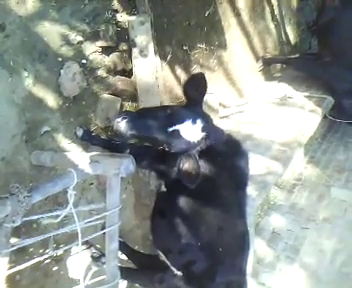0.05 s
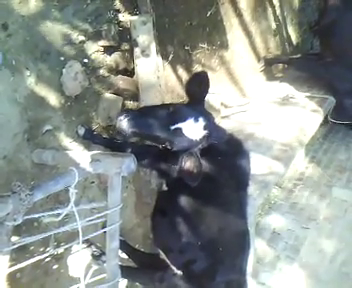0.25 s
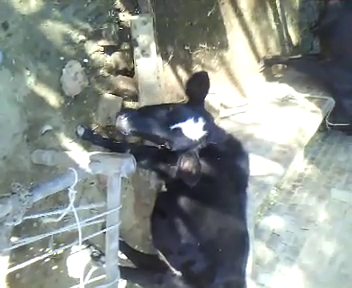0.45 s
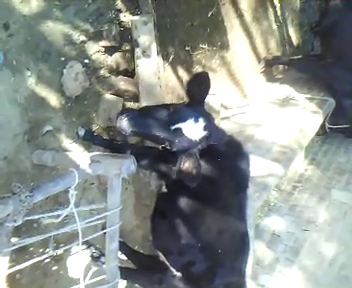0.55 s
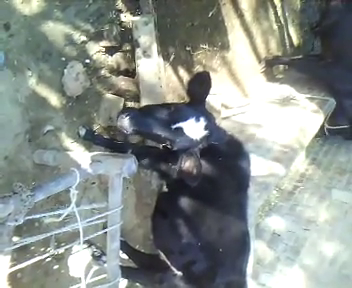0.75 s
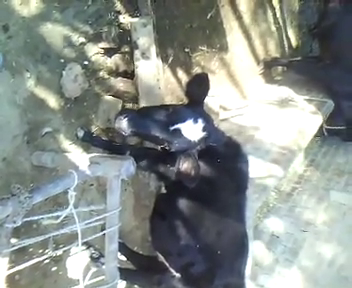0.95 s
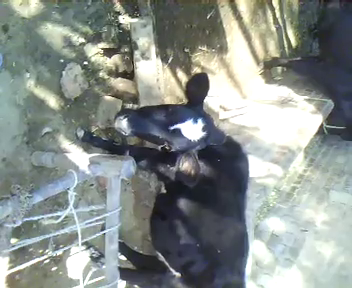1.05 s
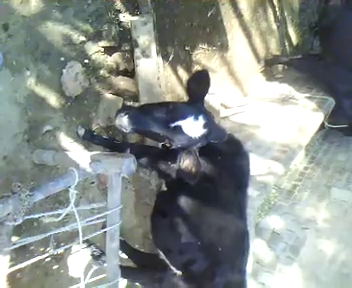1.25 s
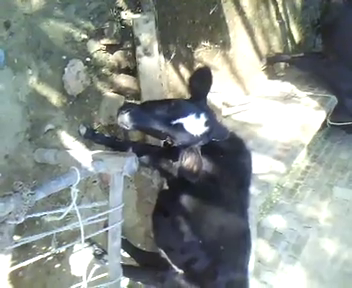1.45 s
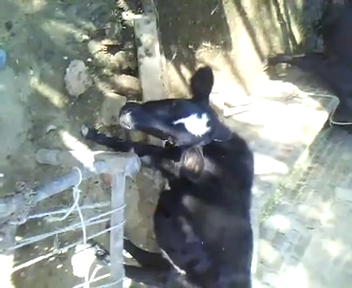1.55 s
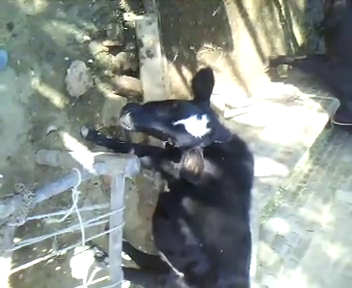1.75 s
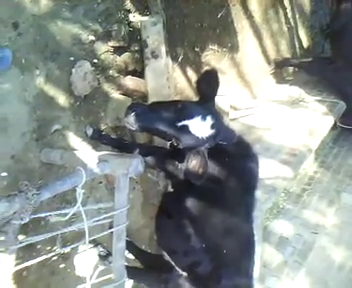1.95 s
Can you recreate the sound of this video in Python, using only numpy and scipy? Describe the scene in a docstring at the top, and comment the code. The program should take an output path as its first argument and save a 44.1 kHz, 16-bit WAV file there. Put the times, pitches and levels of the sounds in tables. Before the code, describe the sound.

A calf gives one long moo, close below the microphone in a yard. It begins as a muffled hum, rising in pitch. The mouth opens halfway around 0.4 seconds, wide around 0.8, then wide again from about 1.1 for the loudest, held part. From 1.5 seconds the pitch sags into a low creak, ending near 1.7. The walls add a very short echo, then it falls silent.

```python
"""A calf gives one long moo in a yard, about a metre below the microphone.
Its vocal folds beat in a clean pulse train whose pitch arches and sags at the end. The call starts as a
hum with the mouth shut; the mouth opens three times, halfway and then wide, lips just parted in between,
and closes on a low creak. The ground mirrors the voice and the walls add a short tail, over a faint
distant rumble and hum. The noise gate behind the microphone shuts when the call ends."""
import sys
import numpy as np
from scipy import signal
from scipy.fft import rfft, irfft
from scipy.io import wavfile
from scipy.ndimage import uniform_filter1d

SR = 44100
rng = np.random.default_rng(int(sys.argv[2]) if len(sys.argv) > 2 else 0)


def store_wav(level_fs):
    """Save 16-bit WAV to argv[1]."""
    pcm = np.round(np.clip(np.atleast_2d(level_fs), -1, 1) * 32767)
    wavfile.write(sys.argv[1], SR, pcm.T.astype(np.int16))


N = 88200

# Resonances of throat, nose and mouth, one table per mouth shape (f/Hz, bandwidth/Hz, relative level/dB)
SHUT_RESONANCES = [(280, 220, -53), (526, 83.0, -42.5), (769, 68, -36.5), (1168, 187.0, -37.5),
                   (1920, 70, -47.5), (2190, 110, -44.5), (3138, 270, -46), (3670, 379.0, -62.5),
                   (4640, 130, -72.5), (4954, 110, -56), (5935, 206.0, -67.5)]
PARTED_RESONANCES = [(327, 240, -52), (481.4, 24, -41), (813, 110, -39.5), (1102, 101, -34.5),
                     (1214, 86, -33.5), (1927, 80, -48.5), (2350, 200, -48), (3407, 260, -53.0),
                     (4225, 72, -52.5), (4800, 200, -59.5), (5890, 200, -63), (7040, 57, -81.5)]
HALF_OPEN_RESONANCES = [(370, 21, -27), (481, 46, -41), (870, 43, -47.5), (1240, 150.0, -28),
                        (1716, 270, -33.5), (1998, 110, -30), (2547.0, 117, -27.5), (3210, 220, -40),
                        (3650, 53, -38.5), (4350, 310, -47.5), (5190, 210, -50), (5820, 223.0, -55.5),
                        (6800, 480, -80.5)]
WIDE_OPEN_RESONANCES = [(354.7, 29.7, -27), (451, 120, -35.5), (810, 120, -41), (1110, 83, -26),
                        (1490, 232, -31.5), (2058, 88, -27), (2538, 130, -27.5), (2976, 87, -30.5),
                        (3340, 550, -45.5), (4405, 71, -47), (4660, 140, -49), (5485, 150, -52.5),
                        (5920, 220, -56.5), (6560, 350, -70), (7210, 120, -66)]
# How strongly the voice drives each mouth shape (t/s, relative level/dB)
SHUT_DRIVE = [(0, -9), (.06, -6), (0.129, -5), (0.219, -3), (0.311, -2.5), (.38, -6), (0.458, -44),
              (1.5, -45.5), (1.601, -9), (1.669, -3), (1.71, -31)]
PARTED_DRIVE = [(.285, -12), (.38, 2), (.507, 1), (.65, -1), (.73, 1), (.81, -5.5), (.88, -2), (.95, -4.5),
                (1.045, 0), (1.122, -24.5)]
HALF_OPEN_DRIVE = [(0.283, -36), (.31, -17), (0.335, -2), (0.376, 0.6), (0.422, -0.5), (0.447, -10),
                   (.496, -36)]
WIDE_OPEN_DRIVE = [(.39, -34), (.438, -7.5), (.495, -32.5), (.662, -32), (.724, -12), (.773, -2.5),
                   (.85, -3), (0.884, -16), (.928, -34.5), (.987, -27), (1.063, -2), (1.127, 1.23),
                   (1.36, 2), (1.52, 1.13), (1.614, -2.3), (1.674, -9.5), (1.712, -20.5)]


def calf():
    """The calf, a metre below the microphone: the same pulses sound through each mouth shape in turn."""
    pulses = vocal_folds()
    shapes = [(SHUT_RESONANCES, SHUT_DRIVE), (PARTED_RESONANCES, PARTED_DRIVE),
              (HALF_OPEN_RESONANCES, HALF_OPEN_DRIVE), (WIDE_OPEN_RESONANCES, WIDE_OPEN_DRIVE)]
    return sum(throat(pulses * fading(drive), resonances) for resonances, drive in shapes)


# Pitch of the vocal folds (t/s, f/Hz)
FOLD_PITCH = [(0.0, 89.3), (0.07, 90.87), (0.14, 94.9), (0.3, 105.5), (0.39, 113), (0.44, 115.2),
              (0.6, 119.4), (0.78, 122.4), (0.9, 121.4), (0.98, 120.3), (1.08, 120.9), (1.2, 118.31),
              (1.36, 115), (1.5, 109.8), (1.55, 105.6), (1.6, 98.2), (1.645, 87.4), (1.69, 73.97)]
# Sharpness of the pulses: the folds close softly at the start and the end (t/s, tilt/(dB per kHz))
FOLD_TILT = [(0, -2.5), (.085, -1.6), (.135, 0.75), (.4, -0.27), (.8, .5), (1.1, .5), (1.4, -0.15),
             (1.58, -0.66), (1.695, -4)]


def vocal_folds(harmonics=99, jitter=0.0011, shimmer_db=0.1451, wobble_hz=110):
    """The folds close once a cycle, slightly uneven in pitch and level; air hisses after each pulse."""
    pitch_hz = curve(FOLD_PITCH) * (1 + jitter * walk(wobble_hz))
    cycles = np.cumsum(pitch_hz) / SR - .5
    db_per_harmonic = curve(FOLD_TILT) * pitch_hz / 1000
    fundamental = amp(db_per_harmonic) * np.exp(2j * np.pi * cycles)
    # The harmonics add up as a geometric series.
    pulses = np.real((fundamental - fundamental ** (harmonics + 1)) / (1 - fundamental))
    air = signal.sosfilt(signal.butter(2, 3500, "high", fs=SR, output="sos"), rng.standard_normal(N))
    air_db = -7.5 + (harmonics + 1) / 2 * db_per_harmonic  # follows the middle harmonic
    puffs = np.exp(-(cycles % 1) / 0.28)  # each decays in about a quarter of a cycle
    shimmer = amp(shimmer_db * walk(wobble_hz))
    return pulses * shimmer + amp(air_db) * puffs * air


def throat(x, resonances, low_edge_hz=271, high_edge_hz=7700):
    """The resonances of one mouth shape ring; beyond the two edges the voice falls off steeply."""
    def power(f):
        peaks = sum(amp(db) ** 2 / (1 + 1.66 * ((f - hz) / bandwidth) ** 2) ** 2
                    for hz, bandwidth, db in resonances)
        return peaks / (1 + (low_edge_hz / f) ** 20) / (1 + (f / high_edge_hz) ** 80)
    return ring(x, power)


# Close echoes off the ground, the yard gate and the walls (delay t/s, level/dB before dulling)
CLOSE_ECHOES = [(.00256, -6.5), (.00479, -10.5), (.00592, -14), (.00717, -12.5), (0.01, -16)]


def yard(voice, dull_above_hz=2210, scatter_above_hz=2980):
    """The microphone hears the voice, dull echoes, a wall tail and treble off nearby bars and stones."""
    f = np.fft.rfftfreq(2 * N, 1 / SR)
    echoes = sum(amp(db) * np.exp(-2j * np.pi * f * delay) for delay, db in CLOSE_ECHOES)
    dull_echoes = echoes / (1 + (f / dull_above_hz) ** 2)
    near = irfft(rfft(voice, 2 * N) * (1 + dull_echoes))[:N]
    walls = tail(voice, t60_s=0.21, gap_s=0.0051)
    treble = ring(voice, lambda f: 1 / (1 + (scatter_above_hz / f) ** 6))
    scatter = tail(treble, t60_s=0.04, gap_s=0.0011)
    return near + amp(-11.5) * walls + amp(-5.5) * scatter


def tail(x, t60_s, gap_s):
    """Dense reflections reach the microphone after a short gap and die away."""
    t = np.arange(N // 2) / SR
    response = rng.standard_normal(len(t)) * np.exp(-np.log(1000) * t / t60_s) * (t > gap_s)
    return signal.fftconvolve(x, response / np.linalg.norm(response))[:N]


# Spectrum of the outdoor rumble, far from the microphone (f/Hz, relative level/dB)
RUMBLE_SPECTRUM = [(20, -5.5), (55, -14), (150, -14), (300, -6.5), (1000, -1), (3000, -14), (6000, -25.5),
                   (9000, -49)]


def background(rumble_db=-57, hum_hz=99.5, hum_db=-73.5):
    """In the distance, faint outdoor rumble and a low, slightly wavering hum."""
    hz, db = np.array(RUMBLE_SPECTRUM).T
    rumble = ring(rng.standard_normal(N), lambda f: amp(np.interp(np.log(f), np.log(hz), db)) ** 2)
    wavering_hz = hum_hz * (1 + .01 * walk(rate_hz=12))
    hum = np.sqrt(2) * np.sin(2 * np.pi * np.cumsum(wavering_hz) / SR)
    return amp(rumble_db) * rumble / rumble.std() + amp(hum_db) * hum


def amp(db):
    """Decibels to gain."""
    return 10 ** (np.asarray(db) / 20)


def curve(points):
    """Join (t/s, value) points by straight lines."""
    return np.interp(np.arange(N) / SR, *np.array(points).T)


def fading(points, release_db_per_s=425):
    """Gain of a (t/s, level/dB) curve that dies away before its first point and after its last."""
    t = np.arange(N) / SR
    outside_s = np.maximum(points[0][0] - t, 0) + np.maximum(t - points[-1][0], 0)
    return amp(curve(points) - release_db_per_s * outside_s)


def walk(rate_hz):
    """Smooth random wander with a spread of 1."""
    hold = int(SR / rate_hz)
    steps = np.repeat(rng.standard_normal(N // hold + 1), hold)
    wander = uniform_filter1d(steps, hold)[:N]
    return wander / wander.std()


def ring(x, power):
    """Causal filter with the power response power(f/Hz)."""
    size = 2 * N
    f = np.maximum(np.fft.rfftfreq(size, 1 / SR), 1)
    cepstrum = irfft(np.log(power(f) + 1e-13) / 2)
    cepstrum[1:N] *= 2  # minimum phase: ringing only follows its cause
    cepstrum[N + 1:] = 0
    return irfft(rfft(x, size) * np.exp(rfft(cepstrum)))[:N]


def scene():
    """One microphone in the yard: the calf close below it, the background far off."""
    return (yard(calf()) + background())[None]


def record(dry, threshold_db=-53, depth_db=-39.5, window_s=0.031, top_hz=8900):
    """Behind the microphone a noise gate turns everything down when it is quiet; the top is cut."""
    window = int(window_s * SR)
    power = uniform_filter1d(dry[0] ** 2, window, origin=window // 3)
    closure = 1 / (1 + (power / amp(threshold_db) ** 2) ** 2)  # 0 open, 1 shut
    gated = dry * amp(depth_db * uniform_filter1d(closure, window // 2))
    return signal.sosfilt(signal.ellip(8, .2, 70, top_hz, fs=SR, output="sos"), gated)


dry = scene()
out = record(dry)
store_wav(out)
```